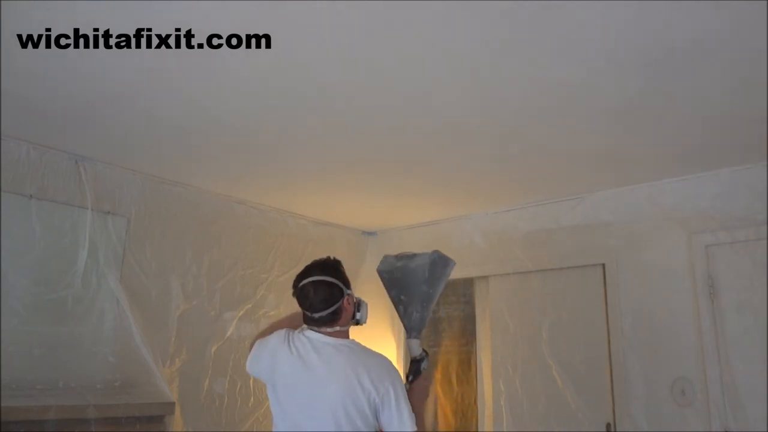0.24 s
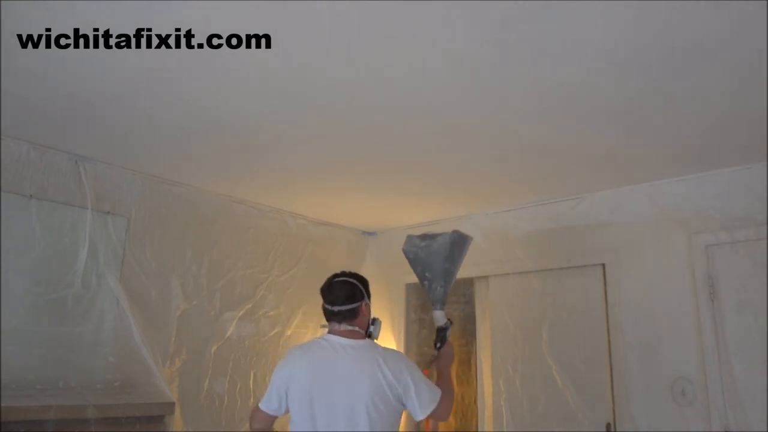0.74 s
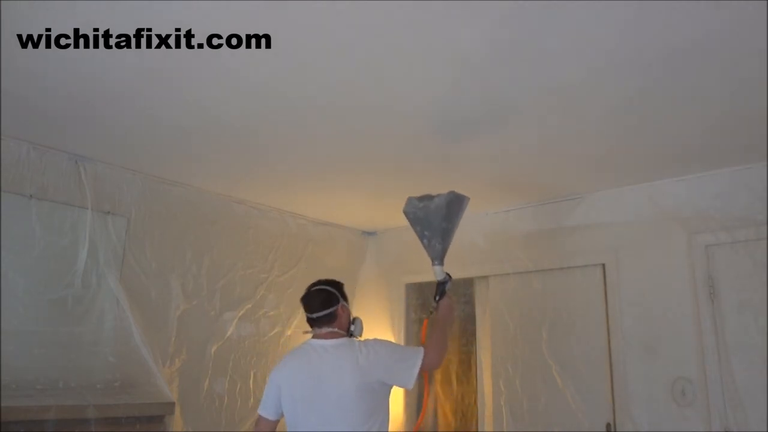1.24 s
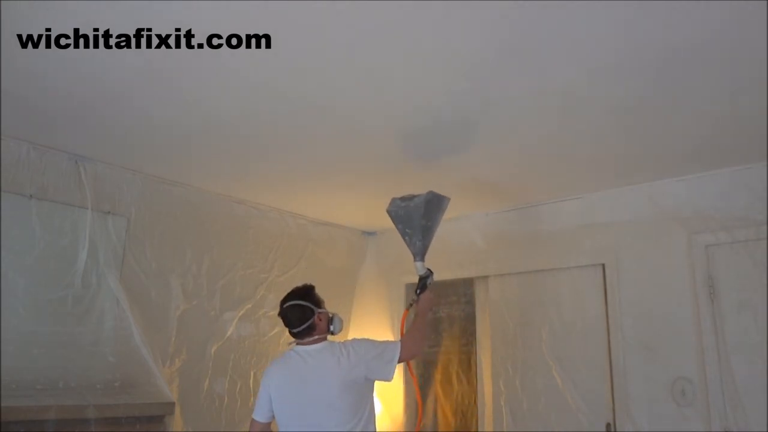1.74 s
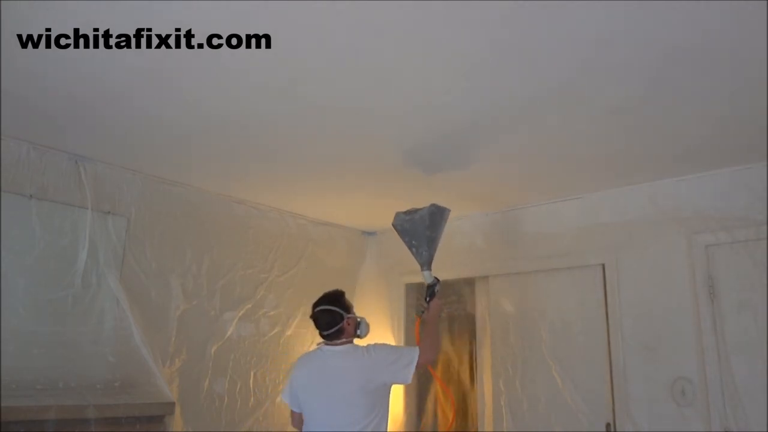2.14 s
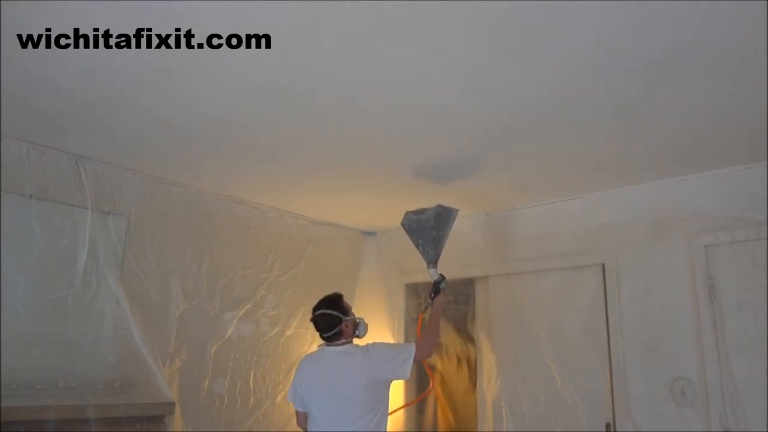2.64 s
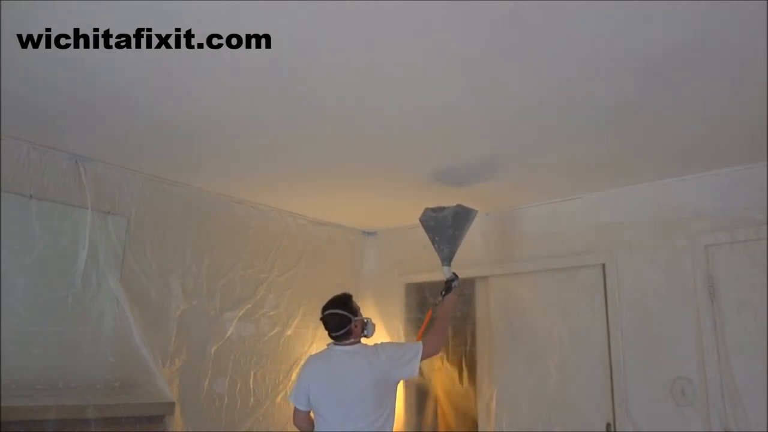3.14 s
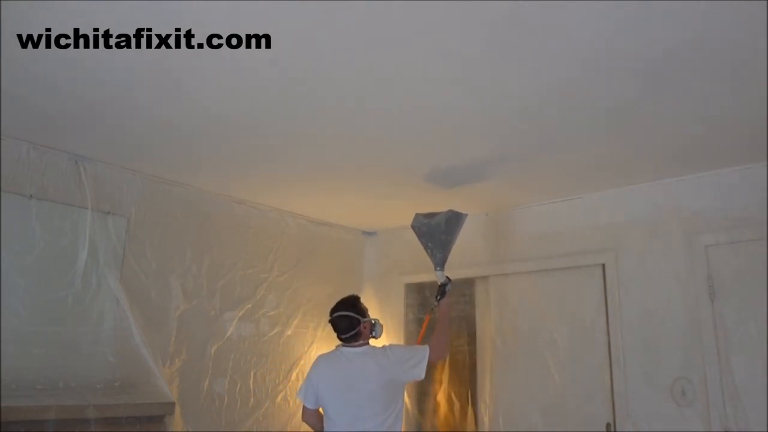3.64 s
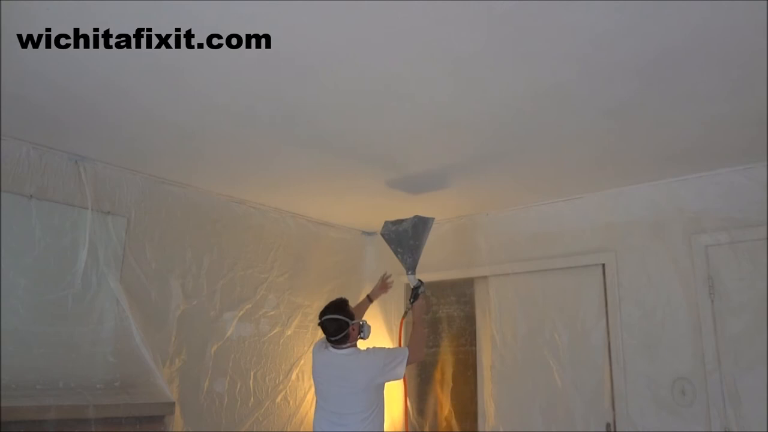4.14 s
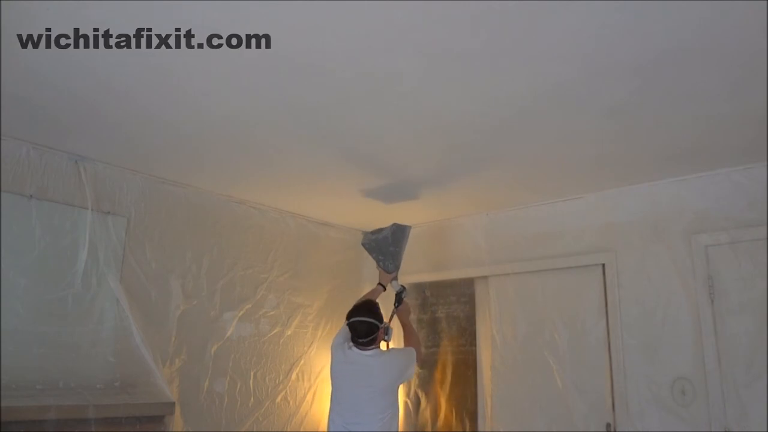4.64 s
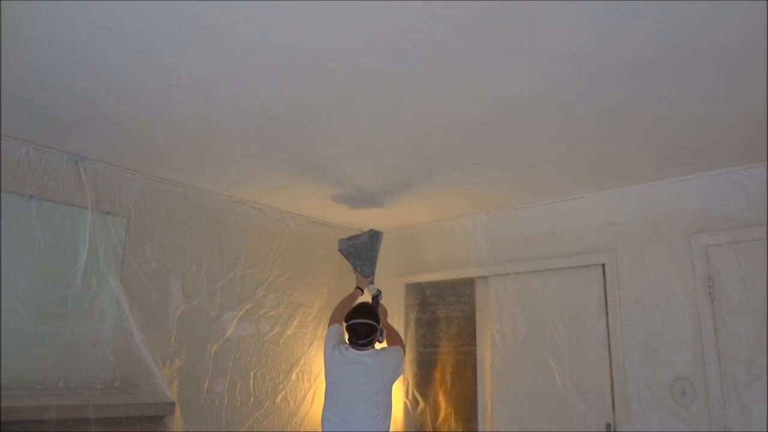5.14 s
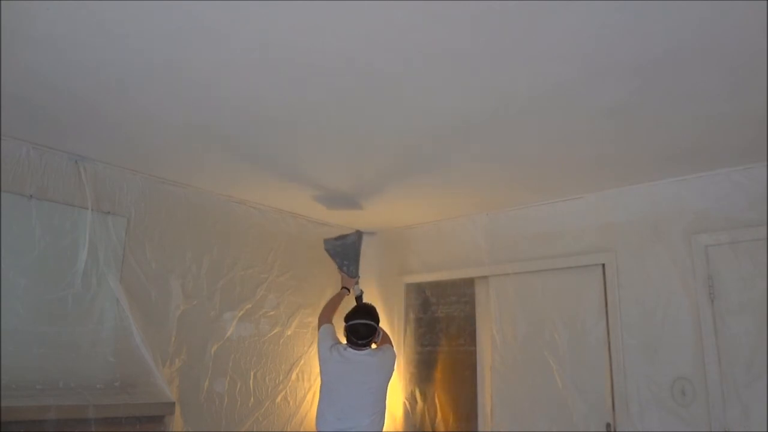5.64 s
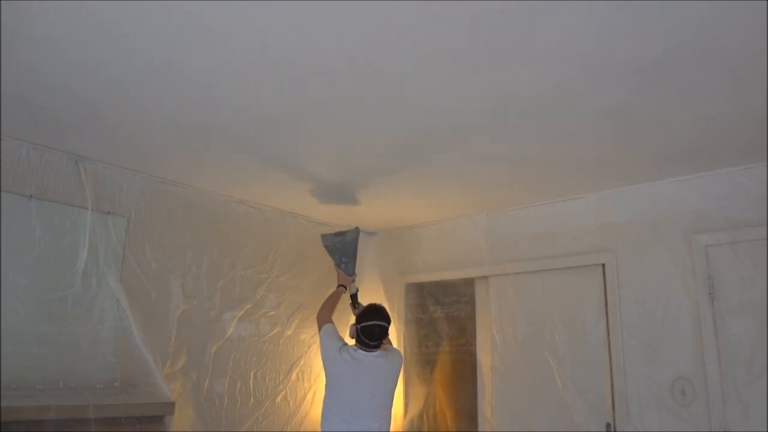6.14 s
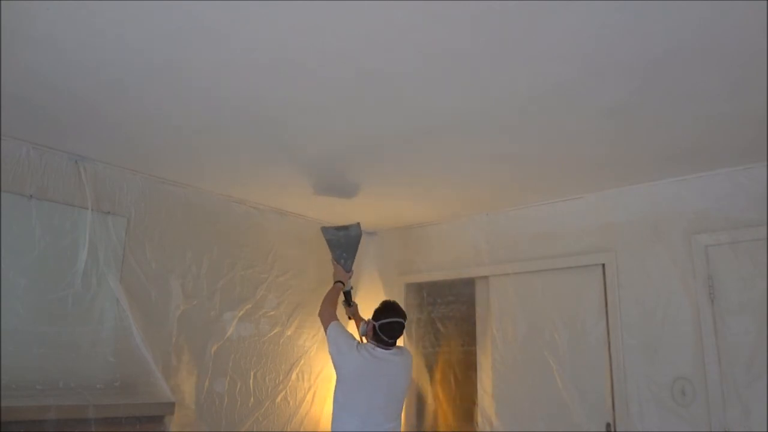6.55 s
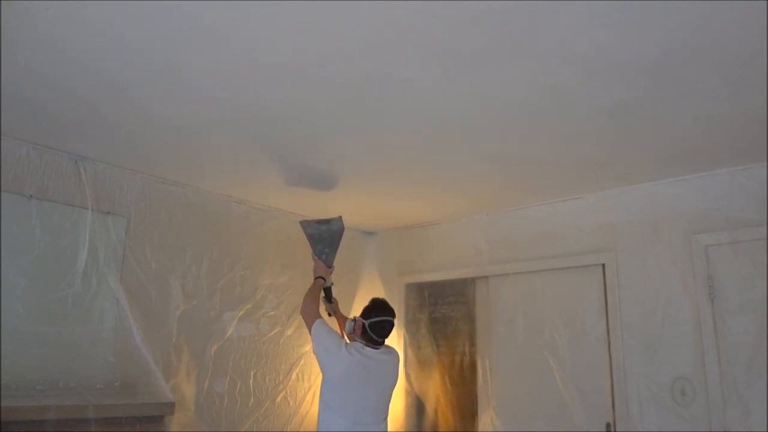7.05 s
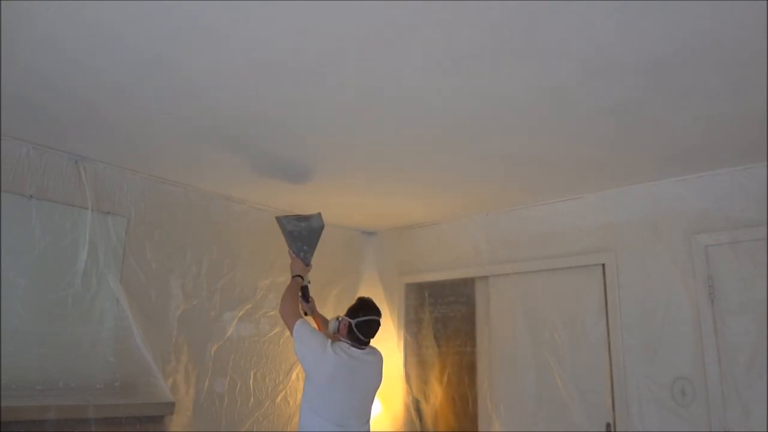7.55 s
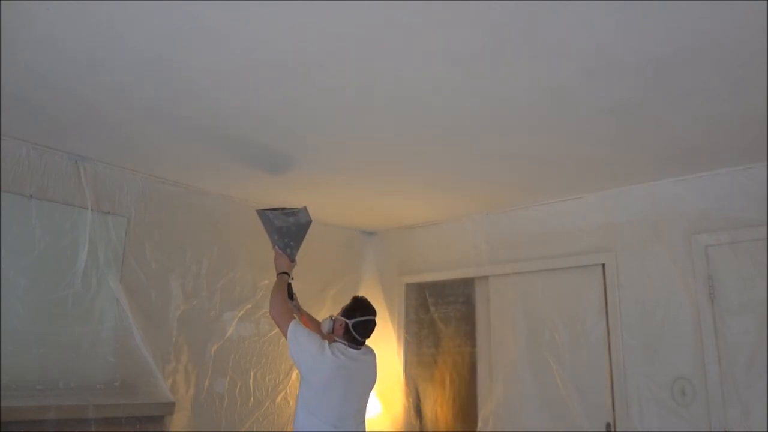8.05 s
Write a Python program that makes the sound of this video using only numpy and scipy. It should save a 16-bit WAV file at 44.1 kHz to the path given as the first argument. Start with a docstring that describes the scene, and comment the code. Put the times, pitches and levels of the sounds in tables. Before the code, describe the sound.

A loud, bright air hiss swells open with faint plastic knocks, then at about three seconds thickens into a spitting, pattering mud spray that continues unbroken.

```python
"""Compressed air first leaks, sings through a turning valve and opens into a bright, steady hiss.
At the trigger the jet of a hopper gun turns fuller: texture mud patters on the ceiling, and spits at first.
Hose and hopper knock now and then in the bare, plastic-lined room, a few metres from a microphone pair.
Beneath lie a faint room tone and very faint short swells of deep bass noise. Jet, mud and knocks are
coloured noise; the valve's song is a row of wavering tones on multiples of one pitch."""
import sys
import numpy as np
from scipy import signal
from scipy.fft import rfft, irfft, next_fast_len
from scipy.io import wavfile
from scipy.ndimage import uniform_filter1d, minimum_filter1d

SR = 44100
rng = np.random.default_rng(int(sys.argv[2]) if len(sys.argv) > 2 else 0)


def transcribe(signal):
    """Save signal, clipped to [-1, 1], as a 16-bit WAV file at the path in sys.argv[1]."""
    frames = np.atleast_2d(signal).T
    limited = np.clip(frames, -1, 1)
    pcm = np.round(limited * 32767).astype(np.int16)
    wavfile.write(sys.argv[1], SR, pcm)


N = 365588

# air valve: a leak, then a steady turn to wide open
LEAK_DB, TURN_S, WIDE_OPEN_S, OPEN_CURVE = -34, 0.25, 0.59, 0.98
# shading of the jet: body in dB an octave below the pivot, edge in dB half an octave above it
JET_PIVOT_HZ = 10000
THROTTLED_BODY_DB, THROTTLED_EDGE_DB = 15.5, 15  # a throttled jet is fuller on both sides
DRY_EDGE_DB, WET_EDGE_DB = 3, -0.8  # mud dulls the edge
RUSH_EDGE_DB, RUSH_ENDS_S = -13, 0.8  # the first rush of air has a duller edge
LOW_FLICKER_DB_PER_OCTAVE = 0.6  # slightly more level flutter in lower bands

# the throttled valve sings in the air tube, louder as it turns, and dies once it is nearly open
SING_DB, SING_RISE_DB, SING_PEAK_S, SING_FADE_DB_PER_S = -47, 12.5, 0.52, 60
SING_DRIFT, SING_FLUTTER_DB = 0.0041, 3  # spread of the pitch as a share, spread of each tone's level
TUBE_HZ, TUBE_WIDTH_HZ, TUBE_ONSET_S = 1392, 190, .06

# trigger: mud starts and takes a moment to flow fully
TRIGGER_S, FILL_S, FILL_CURVE = 3.153, 0.18, 0.28
MUD_DB, MUD_SURGE_DB = -25.5, 1.2
SPIT_ATTACK_S, SPIT_RAGGED_DB = .022, 1.2
THROAT_HZ, THROAT_WIDTH_HZ, THROAT_DB = 654, 78, 13.5  # mud throat, a pipe ringing on multiples

BUMP_LOW_HZ, BUMP_RAGGED_DB = 393, 1.5
SWELL_TOP_HZ = 90
ROOM_T60_S, ROOM_DB = 0.19, -7.5

# room tone holds, then sinks to a floor under the hiss
TONE_DB, TONE_HOLD_S, TONE_WAVER_DB = -66, .9, 4
TONE_SINK_DB_PER_S, TONE_LOW_DB = 14, -90

# microphone pair: side share and separate echoes of knocks and valve song, spread of the leak, band limits
BUMP_LEAN, BUMP_WIDE_DB, LEAK_WIDE_DB = 0.22, -8.5, -10
MIC_LOW_HZ, TOP_HZ, LIMIT = 133, 15850, .99


def undb(db):
    """Gain of a dB value."""
    return 10 ** (np.asarray(db) / 20)


def unit(x):
    """Scaled to rms 1."""
    return x / np.sqrt(np.mean(x ** 2))


def curve(rows):
    """Columns of a time table, one value a sample."""
    s, *columns = np.transpose(rows)
    return [np.interp(np.arange(N) / SR, s, c) for c in columns]


def ramp(start, end):
    """From 0 at start to 1 at end, held outside; it falls over time when end is the earlier."""
    return np.clip((np.arange(N) / SR - start) / (end - start), 0, 1)


def at_hz(table, hz):
    """A spectrum table read on a log-frequency axis."""
    f, v = np.transpose(table)
    return np.interp(np.log(np.maximum(hz, 1)), np.log(f), v)


def colour(x, gain):
    """Filter by a gain given as a function of frequency."""
    size = next_fast_len(len(x))
    hz = np.fft.rfftfreq(size, 1 / SR)
    return irfft(rfft(x, size) * gain(hz), size)[:len(x)]


def walk(rate):
    """Random levels held 1 / rate s and slewed twice; spread 1."""
    k = int(SR / rate)
    steps = np.repeat(rng.standard_normal(N // k + 1), k)
    w = uniform_filter1d(uniform_filter1d(steps, k), k)[:N]
    return w / w.std()


def turbulence(table, swell_db, flicker_db, rate, body_db=0, edge_db=0):
    """Noise in half-octave bands: all follow one unsteady flow, each also flickers alone."""
    size = next_fast_len(N)
    hz = np.fft.rfftfreq(size, 1 / SR)
    noise = unit(colour(rng.standard_normal(N), lambda f: undb(at_hz(table, f))))
    spectrum = rfft(noise, size)
    out, swell = np.zeros(N), swell_db * walk(rate)
    for centre in 16000 / 2 ** (np.arange(15) / 2):
        # overlapping triangles; the lowest band also takes what lies beneath it
        share = np.maximum(1 - 2 * np.abs(np.log2(np.maximum(hz, 125) / centre)), 0)
        band = irfft(spectrum * share, size)[:N]
        octaves = np.log2(centre / JET_PIVOT_HZ)
        shade_db = body_db * np.clip(-octaves, 0, 1.2) + edge_db * max(2 * octaves, 0)
        flutter_db = flicker_db + LOW_FLICKER_DB_PER_OCTAVE * max(-octaves, 0)
        out += undb(swell + flutter_db * walk(2 * rate) + shade_db) * band
    return out


def burst(out, s, db, length, gain, attack):
    """Coloured noise that rises, falls to half at its length and ends by 0.25 s; returns the sum with out."""
    t = np.arange(SR // 4) / SR
    shape = np.minimum(t / attack, 1) / (1 + (t / length) ** 4)
    sound = undb(db) * shape * unit(colour(rng.standard_normal(len(t)), gain))
    return out + np.pad(sound, (int(s * SR), N))[:N]


def air_jet():
    """Compressed air shears out of the nozzle; the valve lets it swell from a leak, the mud dulls its edge."""
    # open jet as the gun sweeps: [t/s, level/dB before shading, extra body/dB an octave below the pivot]
    sweep = [(.67, -9, -2), (.88, -14, 1), (1.1, -12.5, 2), (1.25, -12, 3), (1.57, -14.5, 1.5),
             (1.75, -13, 1), (2.3, -12.5, 1.5), (2.45, -14.5, 2.5), (2.93, -13.5, 1.5), (3.37, -14, 5),
             (3.7, -13, 4.5), (5.3, -12.5, 3.5), (6.25, -13, 3.5), (6.7, -11.5, 0.5), (7.36, -12.5, 3.5),
             (8.29, -12.5, 3.5)]
    # spectrum of the open jet's noise: [f/Hz, relative level/dB per Hz]
    jet_spectrum = [(90, -57), (150, -50), (330, -47), (600, -43), (900, -38.5), (1330, -33), (1480, -29),
                    (2200, -23), (3100, -17), (4800, -12.5), (7000, -8.5), (9000, -4), (11600, 1),
                    (13600, -3.5), (15700, -12)]
    level_db, body_db = curve(sweep)
    shut = 1 - ramp(TURN_S, WIDE_OPEN_S) ** OPEN_CURVE
    edge_db = DRY_EDGE_DB + (WET_EDGE_DB - DRY_EDGE_DB) * mud_flow()
    edge_db += THROTTLED_EDGE_DB * np.sqrt(shut)
    edge_db += RUSH_EDGE_DB * ramp(RUSH_ENDS_S, WIDE_OPEN_S)  # full until wide open, then falls away
    body_db = body_db + THROTTLED_BODY_DB * shut
    return undb(level_db + LEAK_DB * shut) * turbulence(jet_spectrum, 0.37, 0.7, 30, body_db, edge_db)


def mud_flow():
    """Share of the full mud flow: it jumps in at the trigger, then fills."""
    return ramp(TRIGGER_S, TRIGGER_S + FILL_S) ** FILL_CURVE


def throat(hz):
    """Pipe resonances of the emptied mud throat, weaker from each multiple to the next, up to the fifth."""
    gain = 1
    for k in range(5):
        off = 2 * (hz - (k + 1) * THROAT_HZ) / THROAT_WIDTH_HZ
        gain = gain + (undb(THROAT_DB) - 1) * 0.47 ** k / (1 + off ** 2)
    return gain


def mud_spray():
    """Droplets break up and patter densely on the ceiling; whole slugs burst out as ragged spits."""
    # spectrum of the patter: [f/Hz, relative level/dB per Hz]
    patter_spectrum = [(200, -43.5), (400, -31), (750, -22.5), (1300, -6.5), (2200, -6), (3500, -2),
                       (5500, 1.5), (8000, -5.5), (12000, -18)]
    # slugs bursting from the nozzle: [t/s, level/dB before envelope, length/s, top of the colour f/Hz]
    slugs = [(3.356, -22, 0.073, 3800), (3.512, -25, 0.056, 2800), (3.85, -23, 0.057, 3200),
             (4.05, -20.5, 0.051, 3200), (4.404, -32, 0.034, 1500), (4.668, -23, .06, 3000)]
    # spectrum of a slug ahead of its throat and top: [f/Hz, relative level/dB per Hz]
    slug_spectrum = [(350, -46), (620, -15.5), (900, -9.5), (1350, 3), (2100, 9), (3300, 14), (4400, 1),
                     (6500, -19)]
    spits = np.zeros(N)
    for s, db, length, top in slugs:
        def gain(f):
            return throat(f) * undb(at_hz(slug_spectrum, f)) / np.sqrt(1 + (f / top) ** 4)
        spits = burst(spits, s, db, length, gain, SPIT_ATTACK_S)
    surge = undb(MUD_DB + MUD_SURGE_DB * walk(3.0))
    spray = mud_flow() * surge * turbulence(patter_spectrum, 1.0, 0.2, 24)
    return spray + undb(SPIT_RAGGED_DB * walk(110)) * spits


def valve():
    """Throttled air excites the tube's multiples, each at its own time; they wander together and flutter."""
    # tones of the air tube: [multiple of its lowest tone, relative level/dB, start t/s, fade start t/s]
    tube_tones = [(1, -13, .1, .49), (2, -2.5, .12, 0.35), (3, -0.5, 0.18, 0.5), (4, -2, .02, 0.52),
                  (5, 0, .25, 0.61), (6, -6, .15, 0.46), (7, -4, .05, .46), (8, -1, .02, 0.39),
                  (9, 4, 0.18, .45), (10, 1.5, .23, .45), (11, -1, .29, .5)]
    out, t = np.zeros(N), np.arange(N) / SR
    phase = 2 * np.pi * np.cumsum(TUBE_HZ * (1 + SING_DRIFT * walk(12))) / SR

    def slow():
        """Low-passed noise that gives a tone its width."""
        return unit(colour(rng.standard_normal(N), lambda hz: 1 / np.sqrt(1 + (2 * hz / TUBE_WIDTH_HZ) ** 4)))

    for k, db, start, end in tube_tones:
        tone = slow() * np.cos(round(k) * phase) + slow() * np.sin(round(k) * phase)
        fade_db = SING_FADE_DB_PER_S * np.maximum(t - end, 0)
        level = undb(db + SING_FLUTTER_DB * walk(30.5) - fade_db)
        out += level * tone * ramp(start, start + TUBE_ONSET_S)
    return undb(SING_DB + SING_RISE_DB * ramp(TURN_S, SING_PEAK_S)) * out


def hopper(hz):
    """The plastic funnel's rings lift each knock."""
    # rings: [f/Hz, width/Hz, lift alone/dB over the knock's band]
    rings = [(382, 43, 4.5), (610, 55, -0.5), (2100, 970, 7.5)]
    return 1 + sum((undb(db) - 1) / (1 + (2 * (hz - f) / width) ** 2) for f, width, db in rings)


def bumps():
    """Dull plastic knocks: a band from near the hopper's lowest ring to each blow's top, lifted by the rings."""
    # hose and hopper bumps and scuffs: [t/s, level/dB before envelope, length/s, top of the colour f/Hz]
    blows = [(0, -41, 0.066, 1190), (0.029, -35, 0.062, 4200), (0.1, -46, 0.15, 1240),
             (0.27, -51.5, 0.22, 1240), (0.449, -41, 0.091, 1300), (0.501, -28, 0.072, 2520),
             (0.57, -40.5, 0.3, 1710), (0.751, -37.5, 0.057, 2030), (1.06, -46, 0.087, 1410),
             (2.331, -46, 0.025, 1000), (2.356, -41.5, 0.039, 1340), (2.529, -54, 0.037, 800),
             (3.033, -60, 0.026, 700), (3.133, -53, 0.028, 1500)]
    out = np.zeros(N)
    for s, db, length, top in blows:
        def gain(f):
            low_cut = f ** 2 / (f ** 2 + BUMP_LOW_HZ ** 2)
            return hopper(f) * low_cut / np.sqrt(1 + (f / top) ** 6)
        out = burst(out, s, db, length, gain, attack=0.0094)
    return undb(BUMP_RAGGED_DB * walk(90)) * out


def echoes(x, size=8192):
    """Dense reflections off bare walls; their pattern changes as the gun moves."""
    t = np.arange(SR // 2) / SR
    out = np.zeros(N + len(t) + 2 * size)
    fade = np.sin(np.pi * np.arange(2 * size) / (2 * size))  # overlapping blocks, each with its own tail
    padded = np.pad(x, (size, 2 * size))
    for start in range(0, N + size, size):
        decay = np.exp(-np.log(1000) * t / ROOM_T60_S)
        tail = rng.standard_normal(len(t)) * decay * (t > .004)
        block = padded[start:start + 2 * size] * fade
        part = signal.fftconvolve(block, tail / np.linalg.norm(tail))
        out[start:start + len(part)] += part[:len(out) - start]
    return out[size:size + N]


def room_tone():
    """Low room rumble, steady at first, then sinking to a floor, wavering faintly."""
    # spectrum of the rumble ahead of a gentle top cut: [f/Hz, relative level/dB per Hz]
    rumble_spectrum = [(25, -12), (45, -8), (65, 4), (90, 2.5), (160, -2), (300, -21), (600, 0)]
    noise = rng.standard_normal(N)
    rumble = unit(colour(noise, lambda f: undb(at_hz(rumble_spectrum, f)) / (1 + (f / 900) ** 2)))
    sink_db = TONE_SINK_DB_PER_S * np.maximum(np.arange(N) / SR - TONE_HOLD_S, 0)
    level_db = np.maximum(TONE_DB - sink_db, TONE_LOW_DB)
    return undb(level_db + TONE_WAVER_DB * walk(6.5)) * rumble


def bass_swells():
    """Very faint short swells of deep bass noise."""
    # swells: [t/s, level/dB before envelope, length/s]
    faint_swells = [(2.58, -80, .13), (3.14, -82, .05), (3.69, -78, .07), (4.28, -78, .16), (4.6, -82, .04),
                    (5.26, -80, .07), (5.82, -80, .07), (6.73, -78, .11), (7.12, -82, .05)]
    out = np.zeros(N)
    for s, db, length in faint_swells:
        out = burst(out, s, db, length, lambda f: f / (f + 20) / (1 + (f / SWELL_TOP_HZ) ** 4), attack=.02)
    return out


def scene():
    """Direct sound and shared echoes in the middle; the pair leans by frequency and hears other echoes apart."""
    # lean of the shared sound: [f/Hz, left minus right/dB]
    lean = [(380, 0), (700, -2), (1290, 2), (2380, 3.5), (4400, 2.5), (8120, -1), (15000, 0.5)]
    # unshared room sound of the gun: [f/Hz, gain/dB]
    wide = [(100, -40), (400, -52), (900, -18.5), (2000, -12), (3800, -7.5), (5500, -25.5), (9000, -33.5),
            (15000, -33)]
    gun, knocks = air_jet() + mud_spray(), bumps() + valve()
    near, wet = gun + knocks, undb(ROOM_DB)
    mid = (near + wet * echoes(near)) / np.sqrt(1 + wet ** 2)
    side = colour(mid, lambda f: np.tanh(np.log(undb(at_hz(lean, f))) / 2))
    apart = echoes(gun)
    side += colour(apart, lambda f: undb(at_hz(wide, f)))
    # the opening leak spreads wide, narrowing as the hiss steadies
    side += undb(LEAK_WIDE_DB) * ramp(WIDE_OPEN_S, SING_PEAK_S) * apart
    # knocks and valve song lean left and spread wide
    side += BUMP_LEAN * knocks + undb(BUMP_WIDE_DB) * echoes(knocks)
    thin = signal.butter(6, MIC_LOW_HZ, "high", fs=SR, output="sos")
    pair = np.array([mid + side, mid - side])
    return signal.sosfilt(thin, pair) + room_tone() + bass_swells()


def record(dry):
    """A look-ahead limiter eases the gain down around the highest peaks; the top is cut steeply before and after."""
    cut = signal.ellip(10, .1, 60, TOP_HZ, fs=SR, output="sos")
    x = signal.sosfilt(cut, dry)
    allowed = np.minimum(LIMIT / (np.abs(x).max(axis=0) + 1e-9), 1)
    held = minimum_filter1d(allowed, size=401)
    gain = uniform_filter1d(uniform_filter1d(held, size=200), size=200)
    return signal.sosfiltfilt(cut, gain * x)


dry = scene()
out = record(dry)
transcribe(out)
```